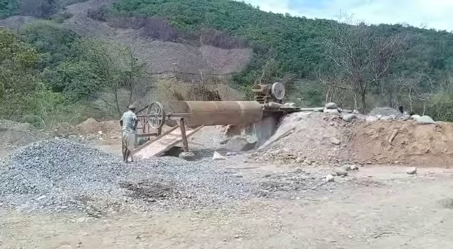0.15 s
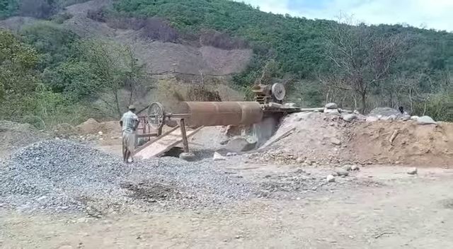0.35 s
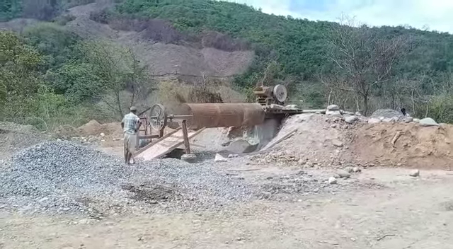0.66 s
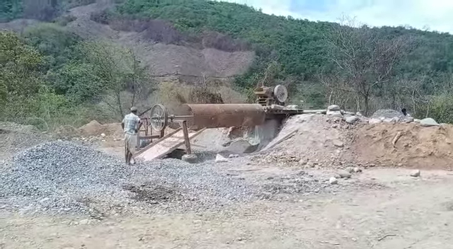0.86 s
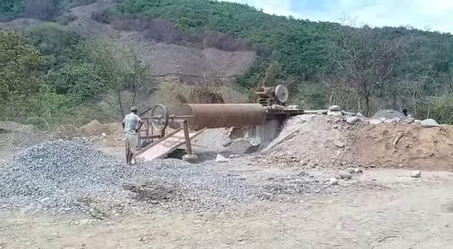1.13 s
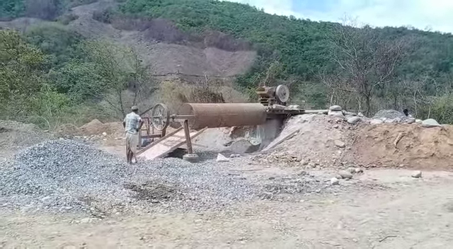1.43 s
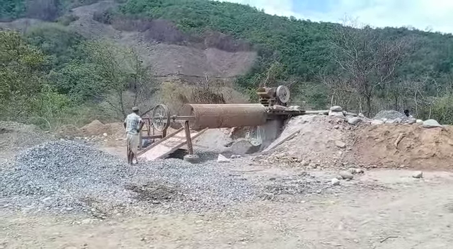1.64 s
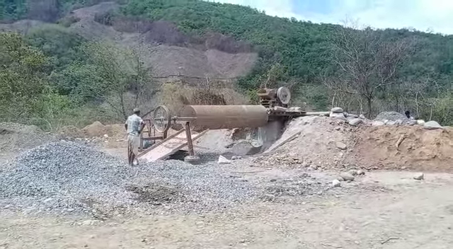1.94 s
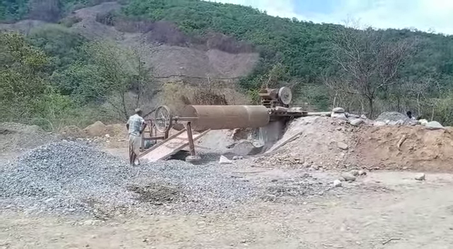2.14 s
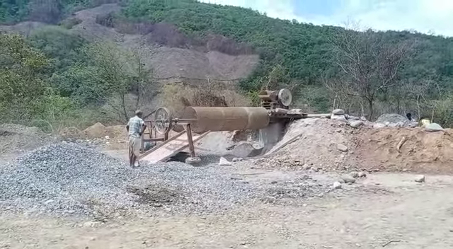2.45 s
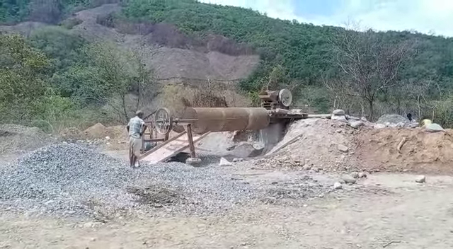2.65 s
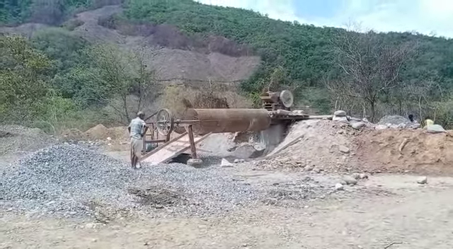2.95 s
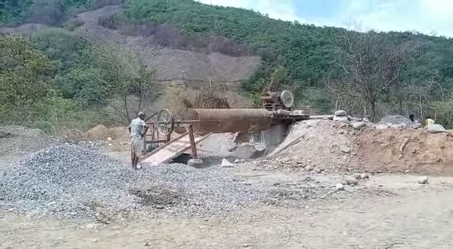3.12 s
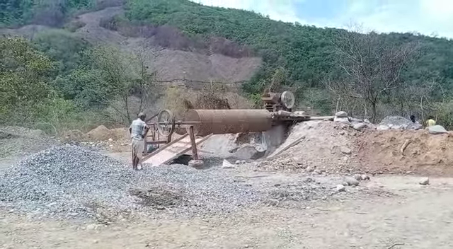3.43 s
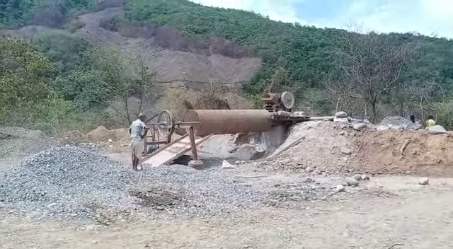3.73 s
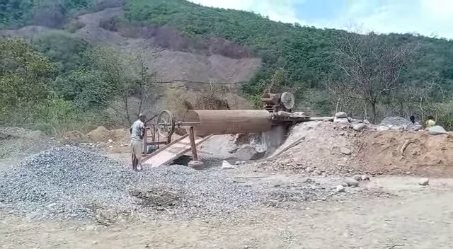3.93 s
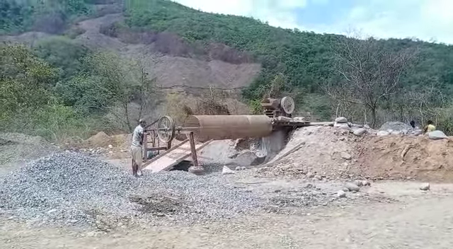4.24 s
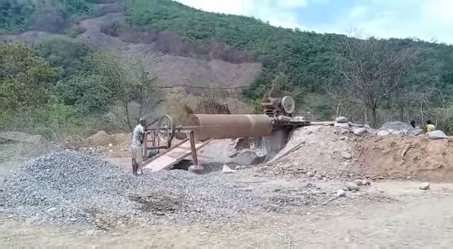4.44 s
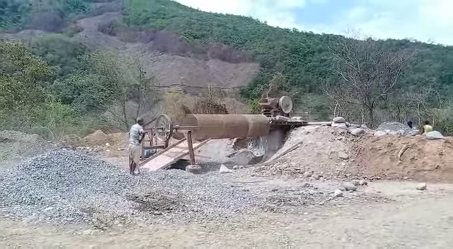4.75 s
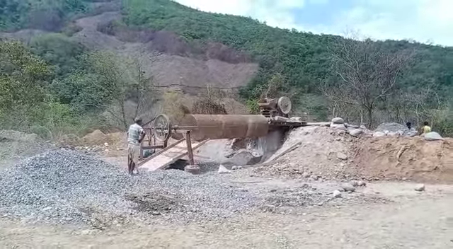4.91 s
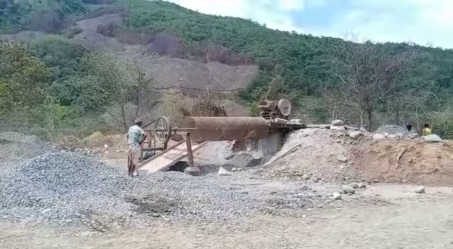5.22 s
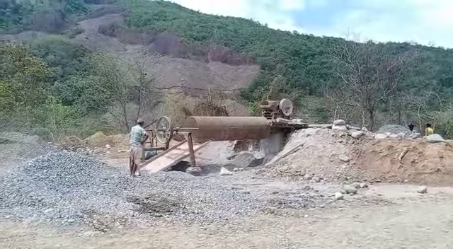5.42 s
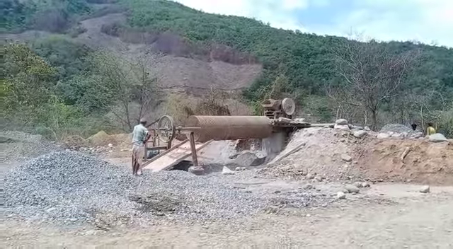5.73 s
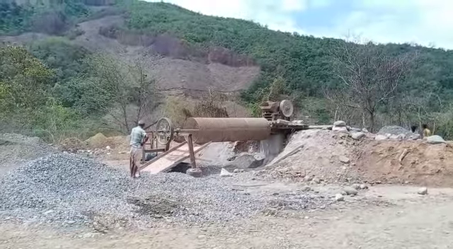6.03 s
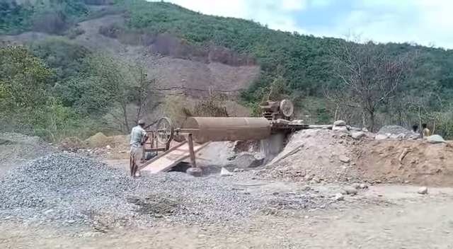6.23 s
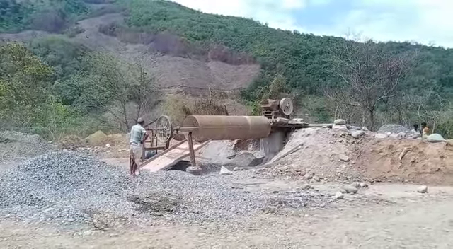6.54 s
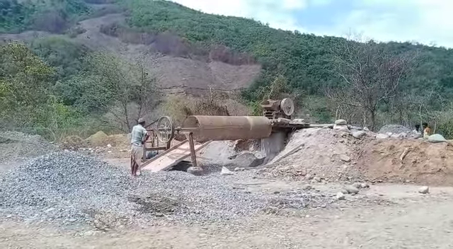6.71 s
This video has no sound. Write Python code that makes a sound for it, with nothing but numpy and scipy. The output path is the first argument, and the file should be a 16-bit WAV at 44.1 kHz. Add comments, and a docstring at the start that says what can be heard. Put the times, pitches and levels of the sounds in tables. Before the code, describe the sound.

A small stone crushing plant runs steadily outdoors, heard from some way off on a hand-held phone. Stones rattle and slide through a rotating steel drum screen, spilling out in bright, gritty rushes, while single big stones clack against the shell. Underneath, a diesel engine hums and a jaw crusher groans about five times a second.

```python
"""Outdoors at a small stone crushing plant, heard some way off on a hand-held phone.
Behind everything a diesel hums, and a jaw crusher groans about five times a second.
Over them, stones rattle and slide through a steel drum screen, clack singly and pour out
in bright rushes. The grip on the phone shifts once and recolours the treble."""
import sys
import numpy as np
from scipy import signal
from scipy.fft import rfft, irfft
from scipy.io import wavfile
from scipy.ndimage import uniform_filter1d, map_coordinates

SR = 44100
rng = np.random.default_rng(int(sys.argv[2]) if len(sys.argv) > 2 else 0)


def dump_mix(stems):
    """Bounce the given channels to the path in sys.argv[1] as a 16-bit WAV at rate SR."""
    frames = np.atleast_2d(stems).T  # one column per channel
    limited = np.clip(frames, -1, 1)  # hard clip at full scale
    pcm = np.round(limited * 32767).astype(np.int16)
    wavfile.write(sys.argv[1], SR, pcm)


N = 302967
TIME = np.arange(N) / SR

# Stone moving through the drum: (time [s], rattle level [dB], slide level [dB])
FLOW = [(0, -31, -22), (.12, -27, -19), (.2, -26.5, -18), (.55, -25.5, -18), (1.12, -24.5, -20),
        (1.3, -27, -18), (1.85, -24.5, -18.5), (2.3, -26.5, -19), (2.8, -25.8, -19), (3, -24, -18),
        (3.3, -26, -19.5), (3.8, -26, -18.5), (4, -24, -19.5), (4.15, -26, -18.5), (5.62, -26.5, -19),
        (5.78, -29.5, -18.5), (5.95, -26.5, -19), (6.87, -27.5, -20)]
# Rushes of stone leaving the drum: (time [s], slide level [dB], grit level [dB])
POURS = [(0.1416, -24, -33), (0.4439, -25, -34), (0.5292, -22, -25), (0.7452, -18, -31), (0.85, -16, -40),
         (0.9233, -20, -34), (1.05, -26, -40), (1.2146, -21, -31), (1.345, -21, -27), (1.6726, -24, -31),
         (1.76, -24, -32), (2.151, -14, -30), (2.2124, -27, -30), (2.391, -21, -31), (2.6254, -19, -33),
         (2.7591, -26, -29), (2.87, -20, -24), (3.0679, -24, -33), (3.1398, -27, -32), (3.3618, -24, -30),
         (3.595, -12, -36), (3.698, -23, -34), (3.89, -23, -31), (4.0642, -21, -31), (4.1919, -21, -25),
         (4.2722, -23, -28), (4.3395, -22, -29), (4.4298, -20.5, -22), (4.6718, -21, -30),
         (4.7706, -27, -31), (4.9531, -23, -30), (5.0963, -23, -27), (5.19, -24, -29), (5.3817, -18, -27),
         (5.65, -28, -29), (5.7633, -19, -22), (5.875, -22, -28), (6.0666, -20, -30), (6.15, -20, -34),
         (6.2367, -27, -29), (6.3365, -23, -26), (6.4916, -21, -24), (6.57, -17, -27), (6.7376, -16, -25),
         (6.83, -21, -29)]
# The hand on the phone: (time [s], hold [0 first, 1 shifting, 2 new])
GRIP = [(0, 0), (4.05, 0.045), (4.18, 1), (4.6, 0.9), (4.78, 2), (6.87, 2)]


def amp(db):
    return 10 ** (np.asarray(db) / 20)


def unit(x):
    return x / np.sqrt(np.mean(x ** 2) + 1e-20)


def curves(rows):
    """One value per sample for each column after the time."""
    times, *columns = np.transpose(rows)
    return [np.interp(TIME, times, column) for column in columns]


def wobble(rate):
    """A smooth random curve, rate knots a second."""
    return map_coordinates(rng.standard_normal(int(N * rate / SR) + 4), [TIME * rate])


def filtered(x, gain, size=16384):
    """x through a minimum-phase filter with the given gain over frequency."""
    cepstrum = irfft(np.log(gain(np.fft.rfftfreq(size, 1 / SR)) + 1e-6), size)
    cepstrum[1:size // 2] *= 2
    cepstrum[size // 2 + 1:] = 0
    impulse = irfft(np.exp(rfft(cepstrum)), size)[:size // 2]
    return signal.oaconvolve(x, impulse)[:N]


def spectrum(points):
    """Gain read off (Hz, dB) points on a log axis."""
    freqs, db = np.transpose(points)
    return lambda hz: amp(np.interp(np.log(hz + 1), np.log(freqs + 1), db))


def noise(points):
    """White noise coloured by (Hz, dB) points."""
    return filtered(rng.standard_normal(N), spectrum(points))


def humps(table, hold):
    """Gain, in one hold, of steep-sided resonances whose powers add."""
    return lambda hz: np.sqrt(sum(amp(db[hold]) ** 2 / (1 + (2 * (hz - centre) / width) ** 2) ** 2
                                  for centre, width, *db in table))


def held(x, gains):
    """x coloured by each hold at equal white-noise power, cross-faded as the grip shifts."""
    grip, grid = curves(GRIP)[0], np.linspace(0, SR / 2, SR // 10)
    return sum(np.clip(1 - abs(grip - hold), 0, 1) * filtered(x, gain) / np.sqrt(np.mean(gain(grid) ** 2))
               for hold, gain in enumerate(gains))


def rings(times, hz, size, life):
    """Damped sines, one for each knock, with a time constant of life seconds."""
    t = np.arange(min(round(4 * SR * life.max()), SR // 40)) / SR
    waves = size[:, None] * np.sin(2 * np.pi * hz[:, None] * t) * np.exp(-t / life[:, None])
    at = np.round(times * SR).astype(int)[:, None] + np.arange(len(t))
    return np.bincount(at.ravel(), waves.ravel(), N + SR)[:N]


def bursts(events, rise_s, t60_s):
    """Amplitude envelope: a quick rise at each (s, dB) event and an exponential fall."""
    marks, t = np.zeros(N), np.arange(SR // 2) / SR
    for s, db, *_ in events:
        marks[round(s * SR)] = amp(db)
    shape = (1 - np.exp(-t / rise_s)) * amp(-60 * t / t60_s)
    return signal.fftconvolve(marks, shape)[:N]


def stones(count, band_hz, cycles, spread_db, near_share, patchy_db):
    """Excitation of even colour: far stones merge into patchy noise, near ones ring for a few cycles."""
    cells = signal.stft(rng.standard_normal(N + 512), nperseg=256)[2]
    patches = uniform_filter1d(rng.standard_normal(cells.shape), size=5, axis=0)
    patches = uniform_filter1d(patches, size=9, axis=1)
    far = signal.istft(cells * amp(patchy_db * unit(patches)), nperseg=256)[1][:N]
    low, high = band_hz
    when, pitch, chance = rng.random((count, 3)).T
    hz = low + pitch * (high - low)
    size = amp(spread_db * np.minimum(-np.log(chance), 3))  # big stones are rare
    near = rings(when * N / SR, hz, size * np.sqrt(hz), cycles / hz)
    return np.sqrt(1 - near_share) * unit(far) + np.sqrt(near_share * (high - low) / (SR / 2)) * unit(near)


def flutter():
    """A faint, fitful low flutter, opposite in sign at the two microphone ports."""
    # Left-right difference: (frequency [Hz], level [dB])
    port_spectrum = [(15, -30), (30, -8), (100, 0), (250, -7), (450, -7), (600, -30), (900, -120)]
    fitful = unit(amp(10.3 * wobble(14)) * noise(port_spectrum))
    return amp(-60.5) * fitful * [[1], [-1]]


def diesel(load, shaft_hz=25.46):
    """Shaft orders hum, a little unsteady, over a rumble that grows under the crusher's load."""
    # Engine tones: (multiple of the shaft speed, rms level [dB])
    orders = [(2, -73), (4, -64), (10, -56), (21, -66), (22, -57), (23, -59), (24, -53.5), (26, -51),
              (27, -53), (29, -51)]
    # Colour of the rumble: (frequency [Hz], level [dB])
    rumble_spectrum = [(15, -68), (35, -42), (65, -25), (100, -16), (150, -3), (180, -1), (230, -4.5),
                       (330, -9), (415, -19), (492, -29), (560, -14.5), (730, -32), (1200, -120)]
    # How hard the machine labours: (time [s], relative level [dB])
    labour = [(0, -42), (.6, -38), (1.5, -37), (2.5, -39.5), (3.3, -38.5), (4, -38.5), (5, -38), (6, -37),
              (6.87, -39.5)]
    turns = np.cumsum(shaft_hz * (1 + 0.001505 * wobble(1.99))) / SR
    hum = sum(amp(db + 1.5 * wobble(11)) * np.sqrt(2) * np.sin(2 * np.pi * (order * turns + rng.random()))
              for order, db in orders)
    rumble_db = curves(labour)[0] - 5.5 + 5.9 * load
    return hum + amp(rumble_db) * unit(noise(rumble_spectrum))


def jaw_crusher(start_s=0.122, period_s=0.18955, frame_hz=183.5):
    """Each stroke loads the frame, which groans roughly at its own pitch; returns groan and load."""
    # Strength of each stroke in turn: (level [dB])
    strokes = [-36.5, -39, -33.5, -30.5, -35, -33, -34, -35, -37, -38, -29, -37, -40, -31, -34.5, -41,
               -36.5, -33.5, -35, -35, -41.5, -49, -33.5, -31.5, -34, -36, -34, -41, -35.5, -31.5, -38,
               -31.5, -33.5, -36, -39, -42]
    groan, load = np.zeros((2, N + SR))
    t = np.arange(-SR // 8, SR // 8) / SR  # centred on the stroke
    swell = np.exp(-abs(t / 0.055) ** 2.1)
    for k, db in enumerate(strokes):
        at = round((start_s + period_s * k) * SR)
        drift = np.cumsum(rng.standard_normal(len(t))) * 0.0092
        phase = 2 * np.pi * frame_hz * t + drift + rng.uniform(0, 2 * np.pi)
        groan[at:at + len(t)] += amp(db) * swell * np.sin(phase)
        load[at:at + len(t)] += swell
    roughness = amp(1.7 * wobble(40))
    return groan[SR // 8:][:N] * roughness, load[SR // 8:][:N]


def rattle(level_db):
    """Big stones tumble and sound the lower resonances of drum, chute and microphone port."""
    # Resonances: (centre [Hz], width [Hz], relative level in each of the three holds [dB])
    resonances = [(674, 187, -11, -11.5, -11.5), (838, 155, -5, -6, -6.5), (1238, 383, -1.5, -3.5, -4),
                  (1937, 550, -2.5, -5, -5.5), (2620, 465, 1, -3, -2)]
    knocks = stones(count=2200, band_hz=(550, 3300), cycles=5.5, spread_db=2, near_share=0.2, patchy_db=1)
    return held(amp(level_db) * knocks, [humps(resonances, hold) for hold in range(3)])


def slide(level_db):
    """Middling stones slide over the steel, sounding the upper resonances and surging at each pour."""
    # Resonances: (centre [Hz], width [Hz], relative level in each of the three holds [dB])
    resonances = [(3450, 540, -7, -5.5, -9), (4028, 556, -2.5, 0.5, -4.5), (4634, 760, -2.5, 2, -3.5),
                  (5450, 810, -0.5, 4, 0.5), (5930, 590, 1, 0, -0.5), (6500, 560, -2, -17, -2.5),
                  (6900, 790, -16, -17, -22.5)]
    chinks = stones(count=2500, band_hz=(3200, 7500), cycles=12.4,
                    spread_db=0, near_share=0.15, patchy_db=0.8)
    envelope = np.hypot(amp(level_db), bursts(POURS, rise_s=0.006, t60_s=0.28))
    return held(chinks * envelope, [humps(resonances, hold) for hold in range(3)])


def grit(swing_db):
    """Fine grit fizzes in the top of the treble and flares at each pour."""
    # Colour of the grit, one list for each hold: (frequency [Hz], level [dB])
    colours = [
        [(4120, -41.5), (7000, -5), (7860, -13.5), (9350, -26), (11600, -26), (13800, -7.5), (14800, -11),
         (15500, -17.5)],
        [(4120, -37), (7000, 0), (7290, -4), (7760, -6), (8660, -14), (10400, -44), (10800, -33), (12000, -20),
         (12700, -12), (14500, -13), (15500, -21)],
        [(4120, -30), (7000, 0), (7480, -8), (8720, -12), (10300, -28), (11600, -29), (12700, -14.5),
         (13600, -11.5), (14600, -11.5), (15500, -24)],
    ]
    ticks = stones(count=2500, band_hz=(7000, 15500), cycles=12,
                   spread_db=2, near_share=0.11, patchy_db=0.3)
    hold_db = np.interp(curves(GRIP)[0], [0, 1, 2], [-38.5, -34.5, -33.5])
    fizz = amp(hold_db + swing_db + 0.7 * wobble(9))
    rushes = bursts([(s, db) for s, _, db in POURS], rise_s=0.0034, t60_s=0.21)
    return held(ticks * np.hypot(fizz, rushes), [spectrum(colour) for colour in colours])


def clacks():
    """Single big stones strike the shell: a crack of first contact and a brief ring."""
    # Strikes: (time [s], relative level [dB], brightness [dB])
    strikes = [(0.1024, -14, -9), (1.8151, -6, -13), (1.845, -5.5, -20), (2.019, -7.5, -10),
               (2.1652, -10, -7), (2.2013, -14, -9), (2.3077, -15, -6), (2.5303, -16, -5), (2.785, -8, -11),
               (2.907, -11, -5), (3.026, -5, -12), (3.2525, -20, -10), (3.5902, -7.5, -9), (3.733, -12, -2),
               (3.756, -19, -5), (3.8864, -17, -9), (3.995, -6.5, -14), (4.042, -6, -2), (4.5774, -6, -2),
               (4.6358, -13, -9), (4.694, -7, -10), (4.7463, -14, -6), (5.2814, -7, -12),
               (5.631, -4.5, -16), (5.7094, -16, -8), (6.1952, -6, -13), (6.412, -6, -16), (6.535, -7, 2),
               (6.655, -13, -10), (6.6816, -7, -16), (6.8334, -5, -2)]
    # Modes of the struck shell: (frequency [Hz], relative level [dB], life [s], share of brightness)
    modes = [(1240, -11.5, 0.0034, 0), (2670, -2.5, 0.0034, 0.21), (3760, 4.5, .0018, 0.93)]
    # Colour of the first contact: (frequency [Hz], level [dB])
    crack_spectrum = [(500, -38), (1200, -14), (2550, 3), (3120, -3), (3800, 5), (5500, -20), (9000, -41)]
    times, db, bright_db = np.transpose(strikes)
    ring = np.zeros(N)
    for hz, mode_db, life, share in modes:
        detuned_hz = hz * (1 + 0.012 * rng.standard_normal(len(times)))
        size = amp(db - 7 + mode_db + share * bright_db)
        ring += rings(times, detuned_hz, size, np.full(len(times), life))
    # The ring of each strike carries no deep bass.
    ring = filtered(ring, lambda hz: hz ** 2 / np.hypot(hz ** 2, 700 ** 2))
    crack = bursts(strikes, rise_s=0.00043, t60_s=0.02) * unit(noise(crack_spectrum))
    return ring + amp(-8) * crack


def drum_screen(lull_half_s=0.024):
    """Three sizes of stone share the drum's tumbling, and single clacks ring over them."""
    # The sliding stone thins for a moment: (time [s], depth [dB])
    lulls = [(.67, 1), (1.18, 3), (1.52, 2), (2.05, 0.5), (2.35, 1), (2.67, 1.5), (3.03, 1.5), (3.25, 2),
             (3.77, 2.5), (3.95, 2), (4.26, 2), (4.62, 2.5), (4.91, 0.5), (5.15, 2), (5.32, 2.5), (5.5, 1),
             (6.04, 1.5), (6.44, 2.5), (6.71, 2.5)]
    rattle_db, slide_db = curves(FLOW)
    slide_db -= sum(db * np.exp(-((TIME - s) / lull_half_s) ** 2) for s, db in lulls)
    grit_swing_db = 1.3 * (slide_db - slide_db.mean())  # grit swings wider than the slide
    tumble = wobble(13)
    return (rattle(rattle_db + 0.51 * tumble) + slide(slide_db + 0.25 * tumble)
            + grit(grit_swing_db + 0.4 * tumble) + clacks())


def scene():
    """Both microphone ports hear the plant alike; only the flutter differs between them."""
    groan, load = jaw_crusher()
    return flutter() + drum_screen() + groan + diesel(load)


def record(dry, ceiling=0.7, low_cut_hz=48, top_hz=15550):
    """The phone rounds off the tallest peaks, drops the deep bass and cuts all above its band limit."""
    rounded = dry / (1 + abs(dry / ceiling) ** 4) ** (1 / 4)
    hz = np.fft.rfftfreq(N, 1 / SR)
    response = hz ** 2 / np.hypot(hz ** 2, low_cut_hz ** 2) * (hz < top_hz)
    return irfft(rfft(rounded) * response, N)


dry = scene()
out = record(dry)
dump_mix(out)
```